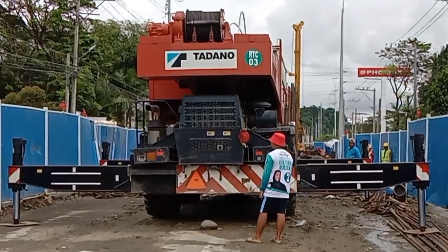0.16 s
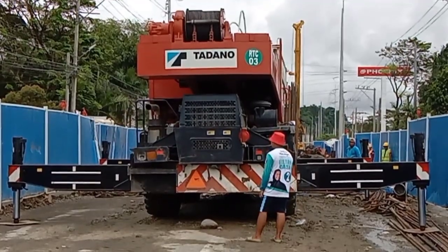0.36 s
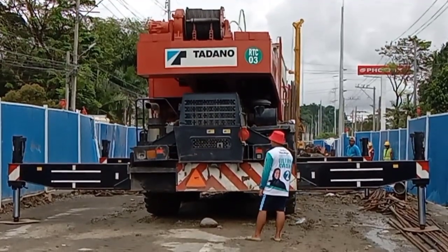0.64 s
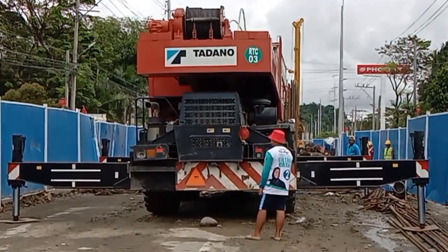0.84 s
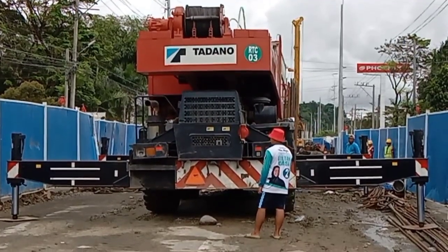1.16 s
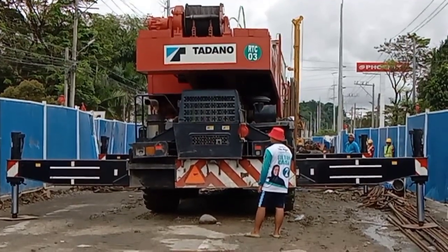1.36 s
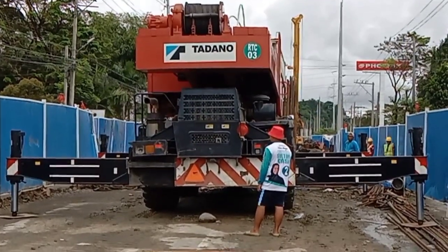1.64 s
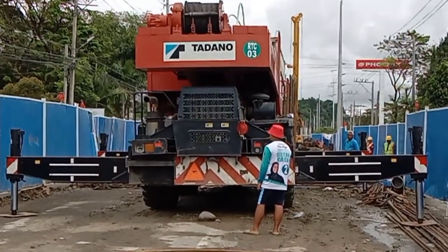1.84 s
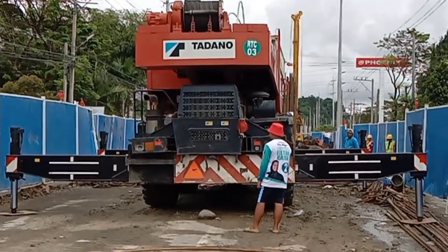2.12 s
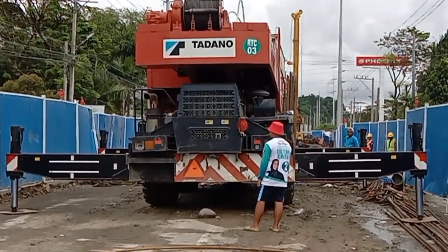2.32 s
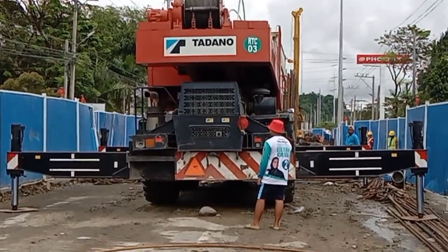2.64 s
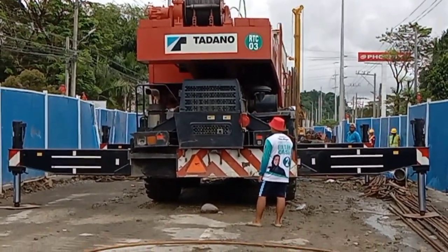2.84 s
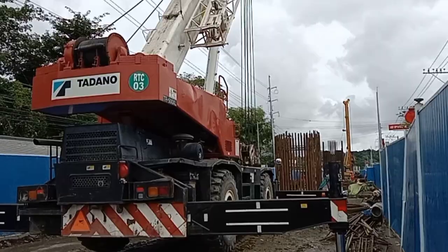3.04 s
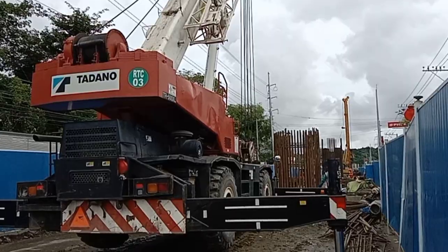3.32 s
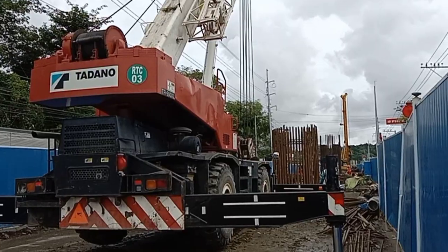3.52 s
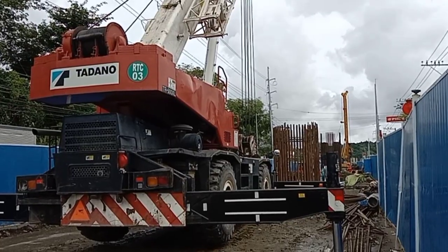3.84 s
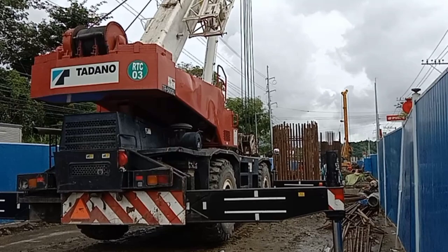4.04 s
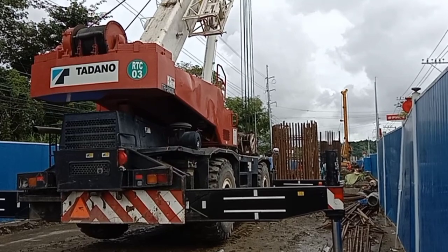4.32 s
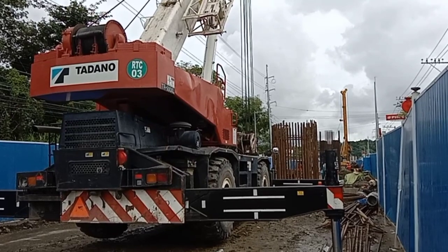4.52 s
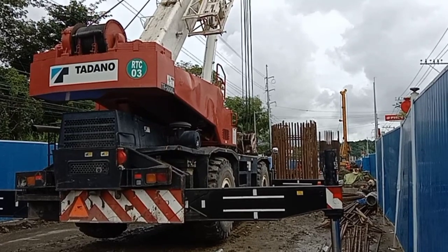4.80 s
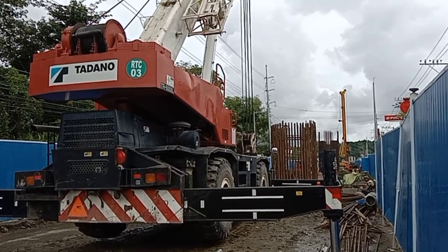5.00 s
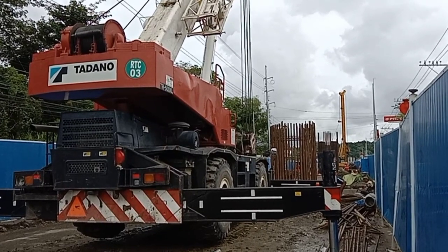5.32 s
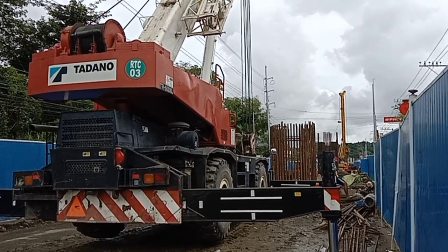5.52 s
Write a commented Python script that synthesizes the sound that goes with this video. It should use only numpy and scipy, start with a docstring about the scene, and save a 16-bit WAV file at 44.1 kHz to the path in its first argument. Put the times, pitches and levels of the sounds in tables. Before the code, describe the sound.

On a building site, a mobile crane's diesel engine runs loudly, heard close from behind, with throbbing exhaust, knocking clatter and hissing cooling air. Loose metal rattles lightly at first, a hydraulic pump drones and fades, and dry metal gives one short, high squeak. About halfway through, the sound breaks off and swells back much quieter, heard from the side, as the engine gathers speed.

```python
"""On a building site, between sheet-metal fences, a mobile crane runs its six-cylinder diesel.
Puffs of gas make the exhaust throb, each firing knocks the engine block, and cooling air hisses.
A pump drones under load, loose metal rattles and dry metal squeaks once, all heard from behind.
Near 3 s the sound breaks off and swells back, much quieter, heard from the side of the machine
as the engine gathers speed."""
import sys
import numpy as np
from scipy import signal
from scipy.fft import rfft, irfft, next_fast_len
from scipy.io import wavfile
from scipy.ndimage import uniform_filter1d

SR = 44100
rng = np.random.default_rng(int(sys.argv[2]) if len(sys.argv) > 2 else 0)


def file_out(sig):
    """Save sig as 16-bit WAV at sys.argv[1]."""
    # one column per channel
    cols = np.atleast_2d(sig).T
    # limit, then scale
    lim = np.clip(cols, -1, 1)
    pcm = np.round(lim * 32767).astype(np.int16)
    wavfile.write(sys.argv[1], SR, pcm)


N = 249606
TIME = np.arange(N) / SR
BREAK_S, RETURN_S = 2.977, 3.068  # the sound breaks off, then fades in from the side


def from_db(db):
    """Turn decibels into a number to multiply by."""
    return 10 ** (np.asarray(db) / 20)


def rms_one(x):
    """Scale to an average strength (rms) of 1."""
    return x / np.sqrt(np.mean(x ** 2) + 1e-20)


def curve(rows):
    """Join (time, value) points with straight lines."""
    return np.interp(TIME, *np.transpose(rows))


def swing(rows):
    """A level curve as dB above or below its average before the break."""
    db = curve(rows)
    return db - db[TIME < BREAK_S].mean()


def drift(rate):
    """A smooth random wobble of size about 1, changing about rate times a second."""
    memory = np.exp(-80 * np.pi * rate / SR)
    slow = signal.lfilter([1], [1, -2 * memory, memory ** 2], rng.standard_normal(N // 40 + 2002))[2000:]
    return np.interp(np.arange(N) / 40, np.arange(len(slow)), rms_one(slow))


def coloured(x, colour):
    """Shape the lows and highs of x by a table, falling steeply past its ends; rms 1."""
    size = next_fast_len(N + SR // 10)
    octave = np.log2(np.maximum(np.arange(size // 2 + 1) * SR / size, 1))
    hz, db = np.transpose(colour)
    octaves_outside = np.abs(octave - np.clip(octave, np.log2(hz[0]), np.log2(hz[-1])))
    gain = from_db(np.interp(octave, np.log2(hz), db) - 39 * octaves_outside)
    return rms_one(irfft(rfft(x, size) * gain, size)[:N])


def adjust_bass(x, db, below_hz=85):
    """Turn the deepest rumble up or down."""
    bass = signal.sosfiltfilt(signal.butter(2, below_hz, fs=SR, output="sos"), x)
    return x + (from_db(db) - 1) * bass


def firings(cycle, uneven_db, jitter_s, cylinders=6):
    """Each cylinder fires once a cycle: a click, a little off in time and strength."""
    at = np.flatnonzero(np.diff(np.floor(cycle * cylinders)))
    timing, strength = rng.standard_normal((N // 100, 2))[:len(at)].T
    at += (jitter_s * SR * timing).astype(int)
    clicks = np.zeros(N)
    clicks[np.clip(at, 0, N - 1)] = from_db(uneven_db * strength)
    return clicks


def bursts(clicks, decay_s):
    """Each click lets go a short dying puff of noise; rms 1."""
    level = signal.lfilter([1], [1, -np.exp(-1 / (decay_s * SR))], clicks + 1e-12)
    return rms_one(level * rng.standard_normal(N))


def echoes(x, echo_db, fade_s, count=40):
    """Sound bounces off the ground, the machine and the fences; later echoes are weaker."""
    delay_s = np.linspace(0, 1, count) ** 2 * .16 + rng.uniform(.002, .006, count)
    strength = rng.choice([-1, 1], count) * from_db(-60 * delay_s / fade_s)
    response = np.zeros(SR // 2)
    response[(delay_s * SR).astype(int)] = from_db(echo_db) * strength / np.linalg.norm(strength)
    response[0] = 1  # the direct sound
    return signal.fftconvolve(x, response)[:N]


def hiss(cycle, colour, tick_db, flutter_db):
    """Air rushes through the grille, with light ticks from the fuel injectors in it."""
    ticks = bursts(firings(cycle, uneven_db=3.5, jitter_s=.0013), decay_s=.0025)
    rush = echoes(rng.standard_normal(N) + from_db(tick_db) * ticks, echo_db=-14.5, fade_s=.075)
    return coloured(rush, colour) * from_db(flutter_db * drift(22))


def rattles(decay_s=.0055, band_hz=(4400, 9500)):
    """Loose metal chatters: each touch is a short bright burst."""
    # metal touches: (time [s], level [dB])
    touches = [(.125, -25.5), (.232, -32), (.242, -35), (.323, -27)]
    level = sum(from_db(db) * (TIME >= s) * np.exp(-np.abs(TIME - s) / decay_s) for s, db in touches)
    band = signal.butter(1, band_hz, "band", fs=SR, output="sos")
    return level * rms_one(signal.sosfilt(band, rng.standard_normal(N)))


def squeak(full_at_s=1.842, hold_s=.051, pitch_hz=6200):
    """Dry metal slips and sings one high note: it builds, holds, stops and rings on faintly."""
    early_s = np.maximum(full_at_s - TIME, 0)
    late_s = np.maximum(TIME - full_at_s - hold_s, 0)
    stop_db, ring_db = -1500 * late_s, -13 - 110 * late_s
    db = -19.5 - 519 * early_s + np.maximum(stop_db, ring_db)
    phase = 2 * np.pi * np.cumsum(pitch_hz + 16 * drift(67)) / SR
    note = np.sin(phase) + from_db(-28) * np.sin(2 * phase)
    return echoes(np.sqrt(2) * from_db(db) * note, echo_db=-6.5, fade_s=.7)


def pump(growl_ratio=.79, gear_ratio=6.12):
    """The hydraulic pump drones and growls, and its gears whine when it runs fastest."""
    # the drone as the pump takes up load and lets go: (time [s], pitch [Hz], level [dB])
    effort = [(0, 258.1, -34), (.25, 276, -27.5), (.6, 288, -22.5), (.73, 292, -30), (.85, 296.9, -22.3),
              (1.05, 289, -29), (1.2, 286, -37.5), (1.5, 281, -47)]
    hz = curve([(s, pitch) for s, pitch, _ in effort])
    db = curve([(s, level) for s, _, level in effort])
    phase = 2 * np.pi * np.cumsum(hz) / SR
    drone = from_db(db + 2.7 * drift(13)) * np.sin(phase + .45 * drift(12))
    growl = from_db(db - 5.5 + 1.9 * drift(6.6)) * np.sin(growl_ratio * phase + 1.6 * drift(14))
    whine_db = -29 + 1.4 * (hz - hz.max())
    whine = from_db(whine_db + 2.9 * drift(12)) * np.sin(gear_ratio * phase + .5 * drift(18))
    return np.sqrt(2) * (drone + growl + whine)


def pipe_hum(speed, pipe_notes, rough_db, wobble):
    """Engine tones swell to a rough hum as they glide past the exhaust pipe's own notes."""
    cycle, hum = np.cumsum(speed) / SR, 0
    for hz, width_hz, db in pipe_notes:
        level = from_db(db + rough_db * drift(13))
        for multiple in hz // speed.max() + np.arange(3):
            closeness = 1 / (1 + (2 * (multiple * speed - hz) / width_hz) ** 2)
            hum += level * closeness * np.sin(2 * np.pi * multiple * cycle + wobble * drift(8.5))
    return np.sqrt(2) * hum


def clatter(cycle, colour, knock_db, uneven_db, decay_s):
    """Firing knocks and valve ticks shake the engine block above the steady rush of the fan."""
    knocks = from_db(knock_db) * bursts(firings(cycle, uneven_db, jitter_s=.0012), decay_s)
    fan = rng.standard_normal(N)
    return coloured(echoes(knocks + fan, echo_db=-13.5, fade_s=.3), colour)


def exhaust(cycle, colour, tones, tones_db, puff_db, throb_db, waver_db, scatter):
    """Puffs and swirling gas surge once a cycle, over clean tones that follow the engine's turning."""
    surge = from_db(throb_db * np.cos(2 * np.pi * cycle + .18 * drift(4.9)))
    puffs = from_db(puff_db) * rms_one(firings(cycle, uneven_db=2.5, jitter_s=.0012))
    gas = coloured(surge * (rng.standard_normal(N) + puffs), colour)
    gas /= np.sqrt(uniform_filter1d(gas ** 2, SR // 9))  # every few cycles push out equal amounts of gas
    hum = 0
    for multiple, db in tones:  # with little scatter they peak together, which makes the chug
        level = from_db(db + waver_db * drift(1.4))
        hum += level * np.cos(2 * np.pi * multiple * cycle + scatter * drift(1.2))
    return rms_one(rms_one(gas) + from_db(tones_db) * rms_one(hum))


def engine_side(start_hz=18.2, target_hz=25.35, climb_s=.87):
    """Further off, beside the crane, the throb stands out as the engine speeds up ever more slowly."""
    # tone colour of exhaust, block, air and highest hiss: (frequency [Hz], relative level [dB])
    gas_colour = [(15, -55), (25, -28), (32, -20), (59, -13), (76, -0.5), (150, 0), (225, -6.5), (291, -6),
                  (320, -21), (344, -30), (369, -16), (420, -20), (550, -32), (920, -120)]
    block_colour = [(200, -36), (340, -3.5), (370, -4), (438, -6.5), (486, -8), (518, -7.5), (575, -5),
                    (740, -6.5), (1210, -2), (1330, -2.5), (1740, -8), (1970, -12), (2760, -16.5),
                    (2910, -16.5), (4200, -25.5), (5460, -50), (9240, -120)]
    air_colour = [(2240, -20), (3800, -22.5), (4240, -11), (4620, -1), (5590, 2), (7130, -1), (7450, -3),
                  (8600, -22), (11200, -41), (18900, -120)]
    sizzle_colour = [(4710, -31), (8000, -0.5), (8750, -4), (10100, -4.5), (13300, -10), (14900, -6),
                     (15600, -10)]
    # clean exhaust tones: (multiple of the engine speed, relative level [dB])
    tones = [(2, -9), (3, -16), (4, -2), (5, 5), (6, 2), (7, -14), (13, -18)]
    # notes the pipe rings at: (pitch [Hz], width [Hz], level [dB])
    pipe_notes = [(155.3, 17, -41.5), (317.6, 16, -53.5)]
    # brief swells of the highest hiss: (time [s], boost [dB])
    swishes = [(3.45, 4), (3.61, 4), (3.82, 1), (4.07, 2), (4.28, 4), (4.57, 3), (4.75, 2), (4.96, 0),
               (5.24, 4), (5.42, 5.5)]
    speed = target_hz - (target_hz - start_hz) * np.exp(-np.maximum(TIME - RETURN_S, 0) / climb_s)
    cycle = np.cumsum(speed) / SR
    swish_db = sum(db * np.exp(-((TIME - s) / .045) ** 2) for s, db in swishes)
    gas = exhaust(cycle, gas_colour, tones, tones_db=-4, puff_db=-5,
                  throb_db=2.5, waver_db=2, scatter=.54)
    return (from_db(-36) * gas
            + pipe_hum(speed, pipe_notes, rough_db=5.2, wobble=.25)
            + from_db(-39.5) * clatter(cycle, block_colour, knock_db=-5, uneven_db=2.5, decay_s=.0034)
            + from_db(.42 * swish_db - 47.5) * hiss(cycle, air_colour, tick_db=-14, flutter_db=1)
            + from_db(swish_db - 56.5) * hiss(cycle, sizzle_colour, tick_db=-9, flutter_db=1))


def engine_rear():
    """Close behind the radiator grille, clatter, air and pipe hum all rise as the engine works harder."""
    # tone colour of exhaust, block, air and highest hiss: (frequency [Hz], relative level [dB])
    gas_colour = [(15, -58), (25, -31.5), (59, -6.5), (92, -5), (129, 0.5), (209, -3.5), (241, -6.5),
                  (352, -12.5), (420, -15.5), (550, -25.5), (920, -120)]
    block_colour = [(200, -27), (340, -20.5), (447, -4.5), (491, -10), (546, -4.5), (717, -4.5),
                    (849, -8.5), (1000, -1), (1200, -1), (1790, -6.5), (2050, -11), (2970, -17),
                    (3480, -18), (3940, -33), (4200, -22), (5460, -53), (9240, -120)]
    air_colour = [(2240, -13), (3800, -6.5), (4110, -11.5), (4730, -1.5), (5460, -0.5), (7150, -5),
                  (8600, -19), (11200, -37), (18900, -120)]
    sizzle_colour = [(4710, -26), (8000, -2), (10600, -5), (12200, -3), (13600, -1.5), (14900, -4.5),
                     (15600, 4)]
    # clean exhaust tones: (multiple of the engine speed, relative level [dB])
    tones = [(3, -14), (4, -10.5), (5, -2.5), (6, -1.5), (7, 1), (9, -6), (18, -7), (24, -9)]
    # notes the pipe rings at: (pitch [Hz], width [Hz], level [dB])
    pipe_notes = [(158.6, 25, -32), (210.4, 21.6, -32)]
    # the engine slows under the pump and recovers: (time [s], speed [cycles/s])
    speeds = [(0, 22.5), (.3, 22.8), (.55, 22.7), (.75, 21.8), (1.2, 20.3), (1.5, 20.6), (1.8, 22.1),
              (2.3, 23), (2.95, 23.3)]
    # how hard the engine works, and how loud treble and exhaust are: (time [s], relative level [dB])
    load = [(0, -19), (0.2, -18), (0.85, -18.5), (0.97, -21.5), (1.5, -24.5), (1.65, -23.5), (2.0, -24.5),
            (2.75, -20.5), (2.95, -23)]
    treble = [(0, -40), (0.25, -38), (0.45, -41.5), (0.85, -40.7), (0.95, -42.5), (1.35, -43),
              (1.65, -39.5), (1.85, -43.5), (2.35, -40), (2.95, -39.5)]
    gas_level = [(0, -21.5), (.2, -24), (.45, -20), (.78, -22), (.95, -21), (1.4, -23), (1.7, -23),
                 (2.15, -25.5), (2.65, -24), (2.95, -25)]
    # the deepest rumble thins under load: (time [s], boost [dB])
    bass = [(0, -5), (.9, -11), (1.4, -5.5), (2, 2), (2.5, 3.5), (2.95, 0)]
    speed, load_db, treble_db = curve(speeds), swing(load), swing(treble)
    cycle = np.cumsum(speed) / SR
    air_db = .48 * load_db + .58 * treble_db
    gas = exhaust(cycle, gas_colour, tones, tones_db=-9.5, puff_db=-3.5,
                  throb_db=1.2, waver_db=4.5, scatter=1.7)
    hum = pipe_hum(speed, pipe_notes, rough_db=3, wobble=.69)
    block = clatter(cycle, block_colour, knock_db=-4.5, uneven_db=2, decay_s=.0037)
    return (from_db(curve(gas_level)) * adjust_bass(gas, curve(bass))
            + from_db(.96 * load_db) * hum
            + from_db(load_db - 21.5) * block
            + from_db(air_db - 31.5) * hiss(cycle, air_colour, tick_db=-5.5, flutter_db=-.74)
            + from_db(treble_db - 38) * hiss(cycle, sizzle_colour, tick_db=-11.5, flutter_db=.86))


def scene(fade_out_s=.009, fade_in_s=.31):
    """One engine heard from two places in turn, the same in both ears."""
    fade_out = np.clip((BREAK_S - TIME) / fade_out_s, 0, 1)
    fade_in = np.clip((TIME - RETURN_S) / fade_in_s, 0, 1) ** .87
    behind = engine_rear() + pump() + squeak() + rattles()
    return np.tile(fade_out * behind + fade_in * engine_side(), (2, 1))


def record(dry, cutoff_hz=15450):
    """The very highest sounds are cut off steeply."""
    return signal.sosfilt(signal.ellip(12, .1, 90, cutoff_hz, fs=SR, output="sos"), dry)


dry = scene()
out = record(dry)
file_out(out)
```